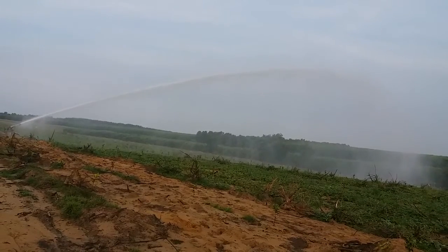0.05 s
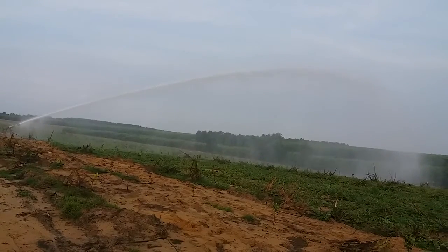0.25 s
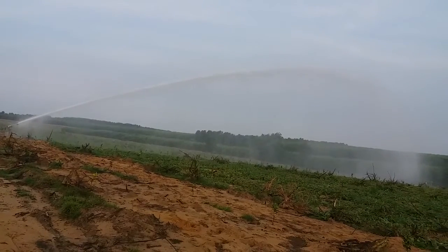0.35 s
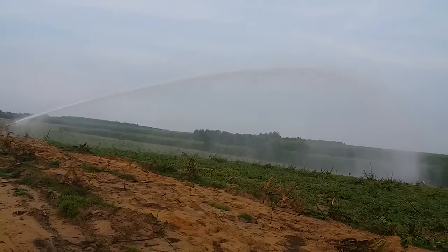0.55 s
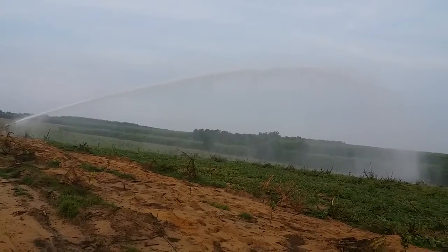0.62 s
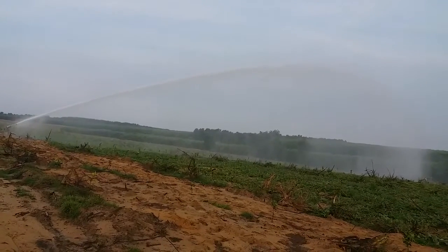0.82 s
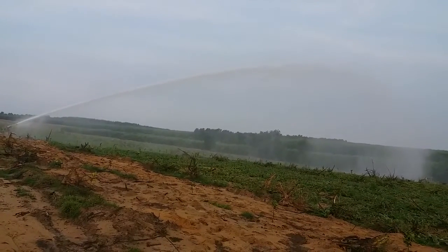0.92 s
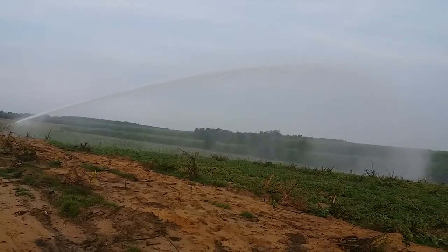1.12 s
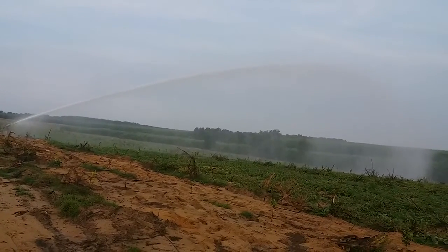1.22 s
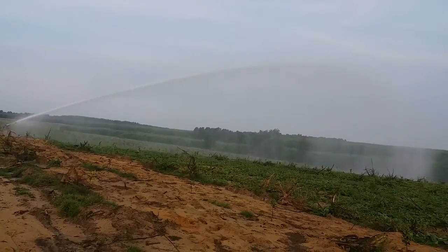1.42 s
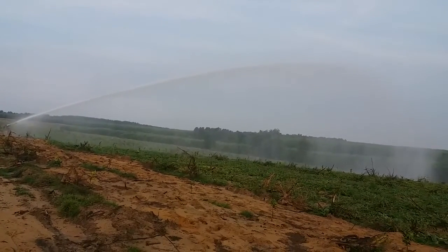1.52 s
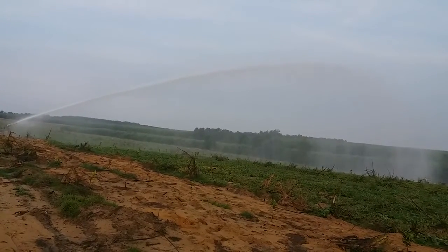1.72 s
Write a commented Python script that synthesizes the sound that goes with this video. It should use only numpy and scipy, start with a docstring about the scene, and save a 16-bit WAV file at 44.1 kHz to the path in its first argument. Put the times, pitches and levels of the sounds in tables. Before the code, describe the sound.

A large irrigation sprinkler rushes and hisses throughout, its water washing onto a crop field. A thin, wavering machinery whine and faint high insect trills run underneath. Light wind rumbles on the microphone, thumping hardest on the left near 0.5 and 0.7 seconds, then in a cluster around 1.3 seconds. The insects rise near 1.4 seconds, and the spray swells slightly around 1.5 seconds.

```python
"""A big irrigation gun throws a steady jet of water over a field. From the start the jet rushes, its
spray hisses and water washes onto the crop, under a thin, wavering machinery whine and faint insects.
A light wind rumbles on the two microphone ports; eddies thump against them, hardest near 0.5 and
0.7 s and again in a cluster near 1.3 s. Towards the end the insect trills rise, then the spray swells."""
import sys
import numpy as np
from scipy import signal
from scipy.fft import rfft, irfft
from scipy.io import wavfile
from scipy.ndimage import uniform_filter1d

SR = 44100
rng = np.random.default_rng(int(sys.argv[2]) if len(sys.argv) > 2 else 0)


def file_out(sig):
    """Save sig as 16-bit WAV at sys.argv[1]."""
    # one column per channel
    cols = np.atleast_2d(sig).T
    # limit, then scale
    lim = np.clip(cols, -1, 1)
    pcm = np.round(lim * 32767).astype(np.int16)
    wavfile.write(sys.argv[1], SR, pcm)


N = 77175  # 1.75 s

PORT_LAG_MS = 0.232  # extra travel time to the right port
# Swell of the spray. Each row: time in seconds, gain in dB.
SPRAY_SWELL = [(0, -4), (.45, -3), (.62, -1.5), (.85, -1), (1.03, -3), (1.25, -2.5), (1.4, -0.2), (1.55, 3),
               (1.75, 1.5)]


def undb(db):
    """Amplitude ratio: a factor of ten for every 20 dB."""
    return 10 ** (np.asarray(db) / 20)


def curve(rows):
    """Linear interpolation between rows of time in seconds and value."""
    times, values = np.array(rows).T
    return np.interp(np.arange(N) / SR, times, values)


def wander(rate_hz):
    """Low-pass random modulation: smoothed random steps with a standard deviation near 1."""
    hold = max(int(SR / rate_hz), 2)
    steps = np.repeat(rng.standard_normal(N // hold + 2), hold)
    return 1.35 * uniform_filter1d(uniform_filter1d(steps, hold), hold)[:N]


def port_noise(spectrum, shared=0, lag_ms=0):
    """Partial coherence: a shared fraction of the noise power reaches both ports, the right one later."""
    spectrum, hz = np.array(spectrum), np.arange(N // 2 + 1) * SR / N
    gains = undb([np.interp(np.log(hz + 1), np.log(spectrum[:, 0]), db) for db in spectrum.T[1:]])
    left, right, common = rfft(rng.standard_normal((3, N)))
    delay = np.exp(-2j * np.pi * hz * lag_ms / 1000)
    incoherent = np.sqrt(1 - shared) * np.array([left, right])
    coherent = np.sqrt(shared) * np.array([common, common * delay])
    return irfft((incoherent + coherent) * gains, N) * np.sqrt(SR / 2)


def tone(hz, ports_db, flicker_db):
    """Propagation through moving air: a tone flutters in level and reaches the right port late."""
    lag_s = np.array([[0], [PORT_LAG_MS / 1000]])
    flutter = wander(13.85) + np.array([wander(24.5), wander(25.2)]) / 2
    level_db = np.array(ports_db)[:, None] + flicker_db * flutter
    cycles = np.cumsum(hz) / SR - hz * lag_s
    return np.sqrt(2) * undb(level_db) * np.sin(2 * np.pi * cycles)


def vortex(t, hz):
    """A passing vortex gives a bipolar pressure pulse of peak 1, its spectrum strongest at hz."""
    phase = 2 * np.pi * hz * t
    return phase * np.exp((1 - phase ** 2) / 2)


def insects():
    """Random amplitude and frequency modulation turns high tones into trills that come and go."""
    # Each row: frequency in Hz, left and right level in dB before the swell.
    carriers = [(5817, -64.5, -67), (5860, -78, -66.5), (5940, -83, -61)]
    # Swell of the trills. Each row: time in seconds, gain in dB.
    swell = [(0, -9), (.55, -4), (.8, -1), (1.1, -10), (1.42, 4), (1.75, -4.5)]
    trills = sum(tone(hz * (1 + 0.0033 * wander(80)), levels, flicker_db=4) for hz, *levels in carriers)
    return trills * undb(curve(swell))


def wind():
    """Turbulent pressure rumbles independently at each port; puffs add their power to a steady breeze."""
    # Rumble spectrum. Each row: frequency in Hz, left and right density in dB per Hz before the gains.
    spectrum = [(20, -98, -98), (33, -86, -84), (50.3, -71, -71), (71, -62, -58), (119, -65, -57.5),
                (157.4, -68, -61), (241, -84.5, -68), (405, -85, -82), (586, -108, -93.5),
                (1200, -120, -118)]
    # Each row: centre in seconds, level in dB over the breeze, Gaussian width in seconds, port (0 left).
    puffs = [(0.024, 7.5, 0.026, 1), (0.214, 13.5, 0.0065, 1), (0.246, 11.5, 0.0074, 0),
             (.335, 10.5, 0.019, 1), (0.363, 9.5, 0.03, 0), (0.461, 6.5, 0.013, 1), (0.566, 7.5, 0.026, 1),
             (0.652, 13.5, 0.019, 1), (0.737, 12.5, 0.013, 1), (0.778, 6, .012, 0), (0.828, 7.5, 0.014, 1),
             (.87, 3, 0.018, 0), (0.884, 8.5, 0.008, 1), (0.986, 12, 0.0097, 1), (1.023, 12.5, 0.025, 0),
             (1.037, 13.5, 0.028, 1), (1.15, 10, 0.012, 1), (1.17, 10, .03, 0), (1.213, 11, .014, 1),
             (1.287, 7, 0.035, 1), (1.347, 11.5, 0.0068, 1), (1.397, 14, 0.0067, 0), (1.486, 10, 0.038, 1),
             (1.607, 6.5, .02, 1)]
    breeze_db, flicker_db = -7.5, 2.26
    t, power = np.arange(N) / SR, np.ones((2, N))
    for at, db, width_s, port in puffs:
        power[port] += undb(db) ** 2 * np.exp(-((t - at) / width_s) ** 2 / 2)
    rumble = port_noise(spectrum) * np.sqrt(power)
    return rumble * undb(breeze_db + flicker_db * np.array([wander(69.6), wander(70.08)]))


def eddies():
    """Vortices strike one port each: a sharp swirl and a slower, opposed thud in a turbulent wake."""
    # Each row: centre in seconds, swirl peak in dB, swirl frequency in Hz,
    # thud in dB relative to the swirl, port (0 left, 1 right).
    strikes = [(.213, -33, 168, -10, 1), (.331, -34.5, 105, 7, 1), (0.5302, -17.5, 260, -1.5, 0),
               (0.5384, -6, 380, -8, 0), (.560, -27, 340, -19, 0), (.645, -32, 242, -5, 1),
               (0.6897, -20.5, 303, -17, 0), (0.6967, -6, 290, -12, 0), (.740, -38, 228, -16, 1),
               (.843, -33.5, 316, 1, 1), (.902, -33, 290, 0, 1), (.980, -32.5, 128, -13, 1),
               (1.044, -26, 222, -1, 1), (1.2098, -25.5, 324, -18, 0), (1.2872, -23.5, 335, -15, 0),
               (1.2940, -12.5, 297, -10.5, 0), (1.3038, -16.5, 404, -12, 0), (1.3282, -17, 278, -13, 0),
               (1.493, -33, 130, 5, 0), (1.511, -30, 295, -20, 1)]
    # Churn round an eddy. Each row: frequency in Hz, relative level in dB.
    wake_spectrum = [(30, -40), (80, -41), (250, 7.5), (520, 8), (800, -47), (1200, -25), (2500, -58)]
    thud_hz, thud_lag_s = 102, 0.0017
    wake_db, wake_width_s = -21, 0.0073
    t, pressure = np.arange(N) / SR, np.zeros((2, N))
    churn = port_noise(wake_spectrum)
    churn /= churn.std()
    for at, db, hz, thud_db, port in strikes:
        swirl = vortex(t - at, hz)
        thud = undb(thud_db) * vortex(t - at - thud_lag_s, thud_hz)
        wake = undb(wake_db) * churn[port] * np.exp(-((t - at) / wake_width_s) ** 2 / 2)
        pressure[port] += undb(db) * (swirl - thud + wake)
    return pressure


def machinery_whine():
    """Periodic vibration gives harmonics: whole multiples of one slightly wavering fundamental."""
    # Each row: time in seconds, fundamental in Hz.
    pitch = [(0, 1224), (.5, 1223), (.75, 1219.5), (.97, 1217), (1.08, 1224), (1.18, 1229), (1.32, 1223),
             (1.55, 1223.3), (1.75, 1220)]
    # Each row: harmonic number, left and right level in dB.
    harmonics = [(1, -56, -89), (2, -52.5, -60), (3, -55, -54), (4, -66, -74), (6, -64, -80),
                 (7, -67.5, -89), (9, -63, -75)]
    hz = curve(pitch) * (1 + 0.00119 * wander(49.44))
    return sum(tone(number * hz, levels, flicker_db=1.5) for number, *levels in harmonics)


def crop_wash():
    """Water landing on the crop merges into a dull, steady noise, almost coherent between the ports."""
    # Each row: frequency in Hz, left and right density in dB per Hz.
    spectrum = [(300, -92, -86), (580, -86.5, -91.5), (850, -80.5, -77.5), (1040, -89.5, -91),
                (1310, -78, -85), (1590, -80, -82), (2100, -90, -86), (4100, -115, -115)]
    return port_noise(spectrum, shared=0.95, lag_ms=0.048)


def spray():
    """Fine spray radiates high-frequency noise; a narrow band within it swells and thins on its own."""
    # In both, each row: frequency in Hz, left and right density in dB per Hz before the swell.
    hiss_spectrum = [(2980, -100, -100), (7300, -95, -89.5), (7800, -85.5, -102.5), (8800, -87, -97),
                     (11100, -85.5, -94), (12500, -86.5, -93), (13300, -91, -99), (14400, -87, -92),
                     (15800, -94, -105)]
    sizzle_spectrum = [(7000, -110, -120), (7930, -90, -106), (8470, -83, -100), (8900, -91, -106),
                       (10200, -110, -120)]
    # Each row: time in seconds, gain in dB.
    sizzle_swell = [(0, -4), (.25, -4), (.4, -2), (.7, 2), (.83, 4), (1.08, -4.5), (1.27, -1), (1.55, 6),
                    (1.75, 3)]
    hiss = port_noise(hiss_spectrum, shared=0.33, lag_ms=PORT_LAG_MS)
    hiss_db = curve(SPRAY_SWELL) + 0.65 * wander(29.8)
    sizzle = port_noise(sizzle_spectrum, shared=0.36, lag_ms=PORT_LAG_MS)
    return hiss * undb(hiss_db) + sizzle * undb(curve(sizzle_swell))


def jet():
    """The water jet radiates broadband noise whose level flickers and weakly follows the spray."""
    # Each row: frequency in Hz, left and right density in dB per Hz before the modulation.
    spectrum = [(102, -95, -85), (418, -86, -86), (590, -94, -97), (1090, -80, -90), (1390, -87.5, -83.5),
                (1570, -81, -81.5), (2070, -78, -76), (2440, -79, -82.5), (2860, -81, -80.5),
                (3210, -84.5, -83.5), (3550, -81, -80), (4410, -84.5, -84), (4950, -89.5, -88.5),
                (6830, -88.5, -86.5), (8300, -111, -100.5), (15500, -104, -102)]
    rush = port_noise(spectrum, shared=0.36, lag_ms=PORT_LAG_MS)
    modulation_db = 0.13 * curve(SPRAY_SWELL) + 0.97 * wander(40.44)
    return rush * undb(modulation_db)


def scene():
    """Superposition: the pressures of all sources add at each microphone port."""
    return insects() + wind() + eddies() + machinery_whine() + crop_wash() + spray() + jet()


def record(dry):
    """Band limiting: the recorder cuts off the deepest bass and the highest treble."""
    low_cut_hz, high_cut_hz = 42, 15700
    highpass = signal.butter(6, low_cut_hz, "highpass", fs=SR, output="sos")
    lowpass = signal.ellip(12, 0.1, 80, high_cut_hz, fs=SR, output="sos")
    return signal.sosfilt(lowpass, signal.sosfilt(highpass, dry))


dry = scene()
out = record(dry)
file_out(out)
```